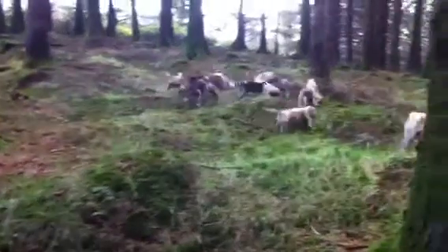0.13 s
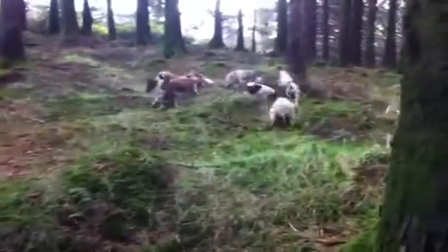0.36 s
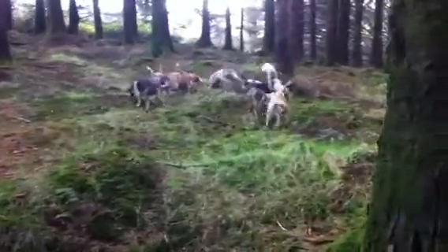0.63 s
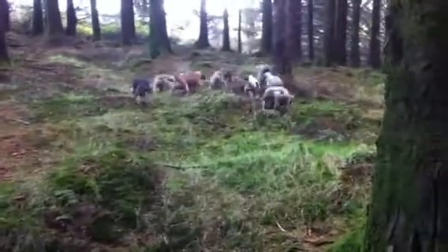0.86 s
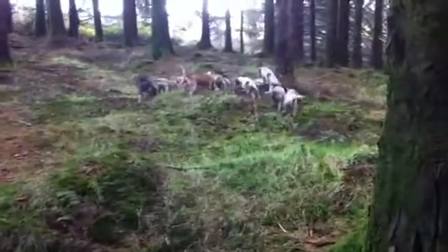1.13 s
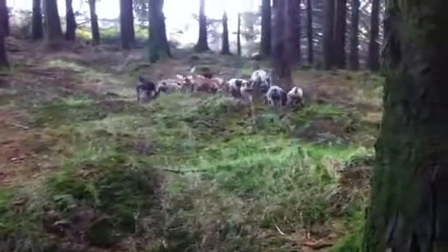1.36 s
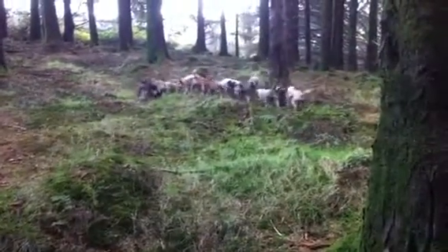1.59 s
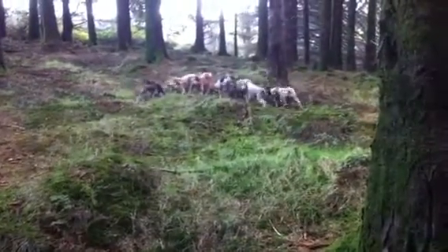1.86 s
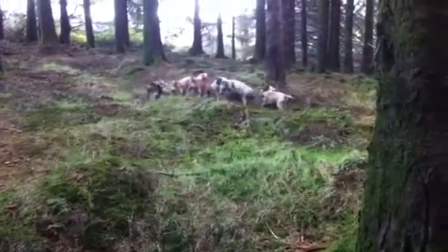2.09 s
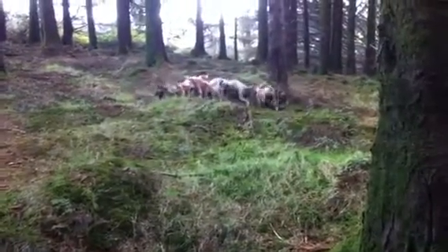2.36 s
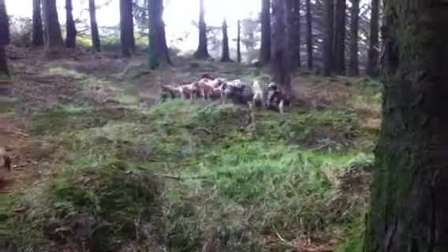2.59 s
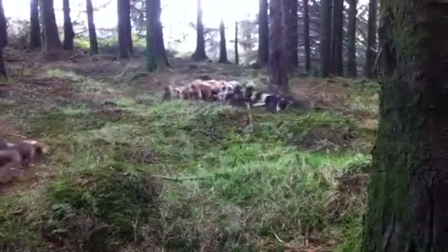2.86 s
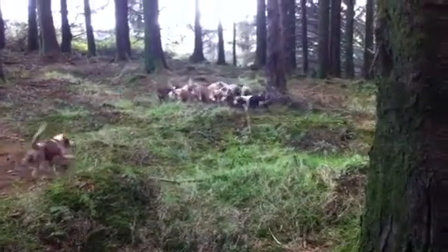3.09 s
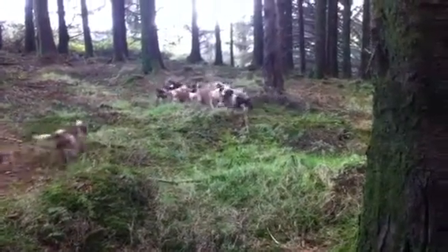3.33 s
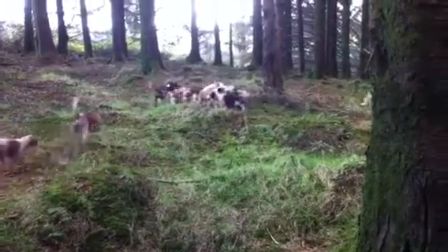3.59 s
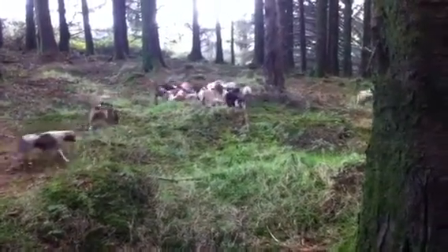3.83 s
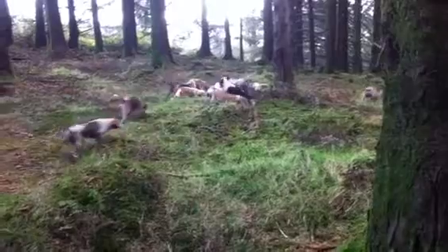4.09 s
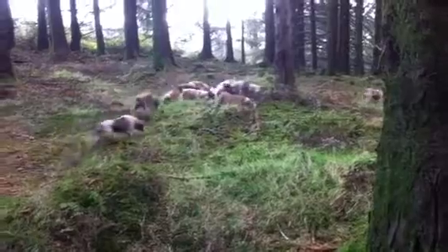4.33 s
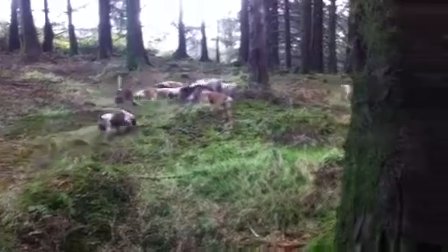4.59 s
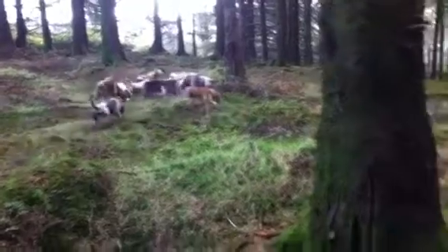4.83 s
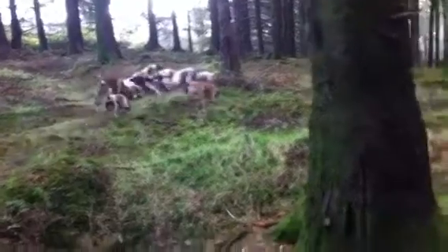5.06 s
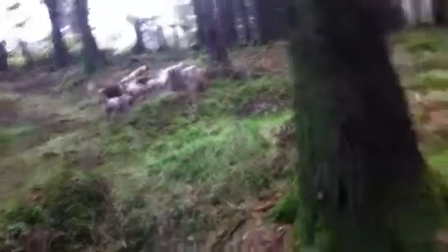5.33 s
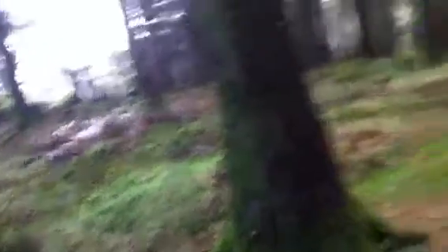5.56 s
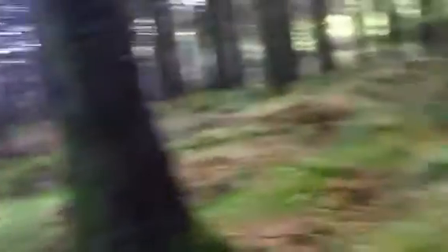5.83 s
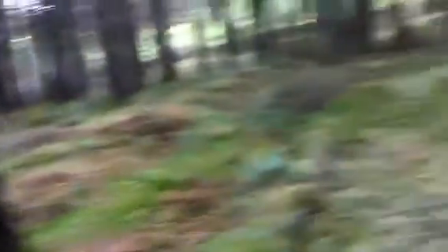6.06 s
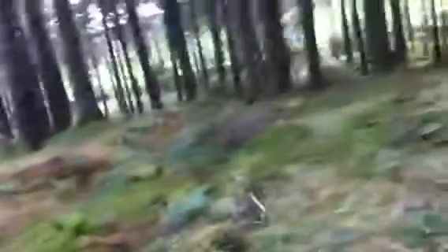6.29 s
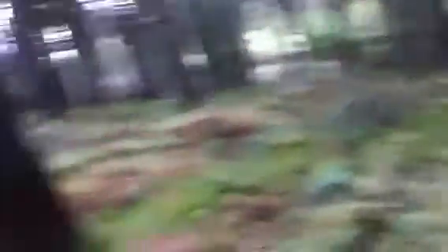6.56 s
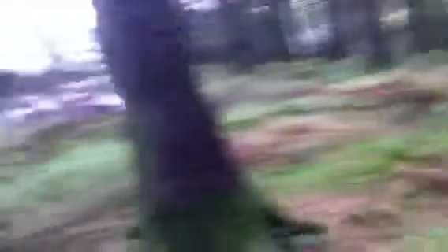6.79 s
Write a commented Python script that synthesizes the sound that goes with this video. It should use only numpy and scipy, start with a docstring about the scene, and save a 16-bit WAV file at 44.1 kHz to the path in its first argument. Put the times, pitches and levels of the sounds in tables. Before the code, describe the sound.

A quiet conifer wood, with soft air and a very faint dry rustle of paws in needles. Sharp twig ticks come at about 0.15, 0.4 and 1.4-1.75 s, with tiny distant yaps before 1 s. At 1.7 s a hound some way off bays for about 0.8 s: a hoarse, mid-pitched cry that leaps to a yelp, dips and wavers, with a rough second pitch beating against it. A louder bay scoops up at 2.9 s and fades by 3.5 s. Near quiet follows, leaving a faint echo tail. The third bay runs from 4.7 to 5.6 s, when dull microphone bumps begin. The fourth, from 6.05 to 6.75 s, is bright and yelping, with faint fluttering high tones. Close rustling grows from 6.1 s; snaps, footfalls and low handling thumps crowd the end, the strongest knock at 6.9 s.

```python
"""Twigs tick and paws rustle through needles and grass in a hushed conifer wood, with faint yaps far off.
From 1.7 s a hound bays four times some way off: two vibrations of its vocal folds beat against each
other through a resonant throat, and the trunks scatter the cries into a long faint tail of decaying noise.
Near the end come close footfalls and knocks on the hand-held microphone as its carrier turns and steps,
made of soft pushes with a rumble; faint high tones, gliding and fluttering, sound during the last bay."""
import sys
import numpy as np
from scipy import signal
from scipy.fft import rfft, irfft
from scipy.io import wavfile
from scipy.ndimage import uniform_filter1d

SR = 44100
rng = np.random.default_rng(int(sys.argv[2]) if len(sys.argv) > 2 else 0)


def voltage_ratio(level):
    """Linear amplitude factor for a level in decibels (scalar or array-like)."""
    return 10 ** (np.asarray(level, float) / 20)


def digitize_waveform(pressure):
    """Quantize a signal to 16-bit integers and store it at the path in sys.argv[1].

    Rows of a 2-D input are taken as channels; values are limited to [-1, 1].
    """
    field = np.atleast_2d(pressure).T
    bounded = np.clip(field, -1, 1)
    quanta = np.round(bounded * 32767).astype(np.int16)
    wavfile.write(sys.argv[1], SR, quanta)


N = 305613

# bays, one curve each for the lower vibration; most start low, leap to a yelp, dip and settle:
# (time [s], pitch [Hz], level [dB])
BAYS = [
    [(1.66, 568, -42.5), (1.695, 579, -36.5), (1.71, 668, -30), (1.80, 670.3, -25.5), (1.90, 557.6, -31.5),
     (2.0, 557, -37.5), (2.06, 594.3, -32.5), (2.26, 571.8, -34), (2.42, 591.4, -34.5)],
    [(2.911, 573.7, -23.5), (2.955, 589.5, -16.5), (3.02, 604.7, -22.5), (3.09, 573, -30.5),
     (3.28, 610.4, -29.5), (3.42, 608.4, -38.5)],
    [(4.738, 582.4, -39), (4.785, 591.8, -20.5), (4.80, 657.5, -26), (4.87, 679, -22.5), (4.96, 594.7, -31),
     (5.05, 630.3, -29), (5.26, 596.7, -36), (5.55, 558.4, -41.5)],
    [(6.049, 560.5, -37), (6.09, 566, -29.5), (6.11, 678.7, -19.5), (6.23, 674.6, -26), (6.26, 588.4, -32),
     (6.37, 610, -33), (6.68, 565.4, -37)],
]
# colour of each bay: (upper layers at the start [dB], clean overtones [dB], bright opening [dB],
# nasal ring [Hz], ring at the start [dB], ring at the end [dB], chest at the end [dB])
COLOUR = [(-37, -8, -6, 2250, -17, -31, -25.5), (-38, -12.5, -7.5, 2280, -30, -23, -27),
          (-38, -6, -1, 2220, -21.5, -12.5, -23.5), (-31, -11, -1.5, 2448, -19.5, -21.5, -24)]
# undergrowth and air: (time [s], rustle of paws and feet [dB], bass of air and handling [dB])
UNDERGROWTH = [(0.0, -63.5, -67.5), (1.618, -64.5, -70), (1.87, -62.5, -66.5), (3.09, -61.5, -68.5),
               (3.709, -66, -72), (4.38, -72.5, -70.5), (4.77, -63.5, -65), (5.5, -65, -69),
               (5.74, -66, -65), (5.82, -57.5, -53.5), (6.04, -62.5, -70), (6.09, -50, -70),
               (6.27, -54.5, -67.5), (6.66, -52.5, -56.5), (6.8, -55.5, -42), (6.93, -54, -51)]
ATTACK_S, RELEASE_S = 0.026, 0.085  # of each bay


def band(x, hz, width):
    """Two-pole resonance, gain 1 at the centre."""
    return signal.lfilter(*signal.iirpeak(min(hz, 18000), hz / width, fs=SR), x)


def unit(x):
    """Scale to rms 1."""
    return x / np.sqrt(np.mean(x ** 2))


def walk(rate):
    """Random levels held 1 / rate s and slewed twice; spread 1."""
    hold = int(SR / rate)
    steps = np.repeat(rng.standard_normal(N // hold + 1), hold)
    slewed = uniform_filter1d(uniform_filter1d(steps, hold), hold)
    return unit(slewed[:N])


def coloured(x, table):
    """Give x the spectrum (frequency [Hz], level [dB]), rms 1."""
    hz, db = np.transpose(table)
    f = np.arange(N // 2 + 1) * SR / N + 1  # 1 Hz up, so the logarithm exists at zero
    gain = voltage_ratio(np.interp(np.log(f), np.log(hz), db))
    return unit(irfft(rfft(x) * gain, N))


def hound():
    """Two vibrations of the folds; where they couple, sum and difference lines fill the throat, with rasp."""
    gate, hz, tone_db, upper_db, clean_db, ring_db, chest_db = bays()
    low, size = folds(hz * (1 + 0.006 * walk(12)), jitter=0.006, shimmer_db=1.5)
    high_hz, level_high = registers()
    high, size_high = folds(high_hz, jitter=0.006, shimmer_db=1.5)

    harmonics = sum(np.sin(k * low) * (1 + 0.35 * (k - 1) * walk(100)) / (k - 1) ** 0.7
                    for k in range(2, 5))
    overtones = voltage_ratio(clean_db) * size * harmonics
    # the beat between both, with its half and other multiples, modulates the lower cry
    beat = high - low
    beating = (0.8 * np.cos(2 * beat) + 0.6 * np.cos(beat / 2)
               + 0.3 * np.cos(beat) + 0.4 * np.cos(3 * beat / 2))
    coupled = size_high * np.sin(low) * beating
    # breath noise that swells with each cycle of the lower vibration
    rasp = (1 + 0.41 * np.cos(low)) * rng.standard_normal(N) * voltage_ratio(2.5 * walk(40))
    upper = voltage_ratio(3.0) * throat(overtones) + unit(throat(coupled)) + voltage_ratio(1.5) * unit(throat(rasp))

    t = np.arange(N) / SR
    ring_source = overtones + 1.6 * rasp
    ring_width_hz = 310
    for bay, (_, _, _, ring_hz, *_) in zip(BAYS, COLOUR):
        nasal = unit(band(band(ring_source, ring_hz, ring_width_hz), ring_hz, ring_width_hz))
        during_bay = (t > bay[0][0]) * (t < bay[-1][0] + RELEASE_S)
        upper = upper + during_bay * voltage_ratio(ring_db) * nasal

    # each bay opens with the mouth wide: a bright burst of overtones and rasp that closes quickly
    wide = [(bay[0][0] + ATTACK_S, colour[2]) for bay, colour in zip(BAYS, COLOUR)]
    wide += [(6.28, -2.5)]  # the mouth opens wide once more within the last bay (s, dB)
    opening = sum(voltage_ratio(db) * np.exp(np.minimum((t - s) / 0.015, (s - t) / 0.061)) for s, db in wide)
    bright = band(voltage_ratio(6.0) * overtones + 2.3 * rasp, 1500.0, 1600.0)
    bright = band(band(bright, 2000.0, 2000.0), 2000.0, 2000.0)
    upper = upper + opening * unit(bright)

    # the difference tones below the cry give it a rough chest
    chest = voltage_ratio(chest_db) * size_high * (np.sin(low - beat) + 2.1 * np.sin(low - beat / 2))
    lower_cry = gate * (voltage_ratio(tone_db) * (size * np.sin(low) + chest) + voltage_ratio(upper_db) * upper)
    return lower_cry + level_high * size_high * np.sin(high)


def bays():
    """Gate, pitch, levels and colour of the lower vibration, all bays on one time axis."""
    silent_db, chest_start_db, darken_db_per_s = -33.5, -43.5, 14
    t = np.arange(N) / SR
    gate, hz, tone_db, upper_db, clean_db, ring_db, chest_db = np.zeros((7, N))
    for bay, (open_db, clean, _, _, ring, ring_end, chest) in zip(BAYS, COLOUR):
        s, pitch, db = np.transpose(bay)
        u, length = t - s[0], s[-1] - s[0]
        on = (u > 0) & (u < length + RELEASE_S)
        attack = (1 - u / ATTACK_S).clip(0, 1) ** 2
        release = ((u - length) / RELEASE_S).clip(0, 1)
        edge_db = silent_db * (attack + release)
        gate += on
        hz += on * np.interp(t, s, pitch)
        tone_db += on * (np.interp(t, s, db) + edge_db)
        upper_db += on * (open_db - darken_db_per_s * u + edge_db)
        clean_db += on * clean
        ring_db += on * (ring + (ring_end - ring) * u / length)
        chest_db += on * (chest_start_db + (chest - chest_start_db) * u / length)
    return gate, hz, tone_db, upper_db, clean_db, ring_db, chest_db


def registers():
    """Pitch and size of the upper vibration, which holds a register briefly, gliding, then jumps to another."""
    # clear registers: (start [s], length [s], start pitch [Hz], end pitch [Hz], level [dB])
    clear_registers = [(1.817, 0.051, 910, 873, -28.5), (1.889, .13, 836, 829, -25.5),
                       (2.02, 0.044, 834.5, 830.5, -32), (2.088, 0.07, 850, 874, -33.5),
                       (2.16, .1, 785.3, 755, -31), (2.265, 0.097, 789, 796, -32),
                       (2.367, 0.081, 725.3, 699.6, -35), (2.441, 0.05, 814, 797, -32.5),
                       (2.972, .11, 886, 871.4, -39), (3.201, 0.089, 833.4, 819, -35),
                       (3.33, 0.13, 860, 799.8, -38), (4.823, 0.19, 921.3, 879.5, -40),
                       (5.163, 0.097, 789, 767, -37), (5.486, 0.072, 830, 795.3, -29.5),
                       (6.059, 0.089, 1040, 929.8, -28), (6.202, 0.095, 938.7, 843, -37.5),
                       (6.305, 0.05, 1151, 1107, -28), (6.605, 0.11, 837, 793, -39)]
    # fainter registers that come by chance in between
    weak_hz, weak_spread_hz, sag_hz_per_s = 830, 55, 230
    weak_db, weak_s = -41.5, 0.07
    t = np.arange(N) / SR
    step = (t / weak_s).astype(int)
    chance = rng.standard_normal((N // 1000, 2))[step].T  # one draw of pitch and level per register
    hz = weak_hz + weak_spread_hz * chance[0] - sag_hz_per_s * (t % weak_s)
    voiced = sum((t > bay[0][0] + ATTACK_S) & (t < bay[-1][0]) for bay in BAYS)
    swell = np.sqrt(2 * np.sin(np.pi * (t / weak_s % 1)).clip(0))
    size = voiced * voltage_ratio(weak_db + 3.0 * chance[1]) * swell
    for s, length, start_hz, end_hz, db in clear_registers:
        u = (t - s) / length
        on = (u > 0) & (u < 1)
        fade = (np.minimum(u, 1 - u) * length / 0.012).clip(0, 1)
        hz = np.where(on, start_hz + (end_hz - start_hz) * u, hz)
        size = np.where(on, voltage_ratio(db) * np.sqrt(2) * fade, size)
    return uniform_filter1d(hz, size=200), uniform_filter1d(size, size=200)


def folds(hz, jitter, shimmer_db):
    """Phase and size of vocal folds whose pitch and strength wander quickly at random."""
    wandering_hz = hz * (1 + jitter * walk(150) + jitter * walk(25))
    phase = 2 * np.pi * np.cumsum(wandering_hz) / SR
    return phase, np.sqrt(2) * voltage_ratio(shimmer_db * (walk(80) + walk(25) / 2))


def throat(x):
    """Resonances of throat and open mouth, each passed twice so the valleys stay dark."""
    # (centre [Hz], width of one pass [Hz], level [dB])
    resonances = [(378, 370, -35), (637, 104, 11.5), (850, 260, 7), (1042, 547, 1.5), (1670, 1500, -27.5),
                  (4470, 3500, -40.5)]
    out = 0
    for k, (hz, width, db) in enumerate(resonances):
        out = out + (-1) ** k * voltage_ratio(db) * band(band(x, hz, width), hz, width)  # neighbours alternate in sign
    return out


def short_glides():
    """Short hoarse glides: faint distant yaps, the rising scoop into the second bay, a falling partial in the fourth."""
    # (start [s], level [dB], start pitch [Hz], end pitch [Hz], length [s])
    glide_list = [(0.259, -56, 1044, 943, 0.041), (0.495, -61, 1420, 1330, 0.066),
                  (.9, -60.5, 1543, 1490, 0.063), (2.868, -41.5, 517.6, 825, 0.072),
                  (2.885, -49, 900, 1283, 0.06), (4.108, -52.5, 889.7, 885, 0.018),
                  (6.27, -42, 1861, 1516, 0.086)]
    return glides(glide_list, hoarse=0.55)


def glides(table, hoarse):
    """Short tones that glide in pitch, roughened by a fast flutter."""
    out = np.zeros(N)
    for s, db, hz, end_hz, length in table:
        t = np.arange(int(length * SR)) / SR
        flutter = 1 + hoarse * unit(uniform_filter1d(rng.standard_normal(20000), 60))[:len(t)]
        tone = np.sin(2 * np.pi * (hz * t + (end_hz - hz) * t ** 2 / length / 2))
        swell = np.sqrt(np.sin(np.pi * t / length))
        out[int(s * SR):int(s * SR) + len(t)] += voltage_ratio(db) * swell * flutter * tone
    return out


def wood(x):
    """Near trunks give a short dense scatter, far ones a long dull tail."""
    near_t60_s, near_db, far_t60_s, far_db = 0.2, -12, 1.5, -16
    t = np.arange(int(1.6 * SR)) / SR
    tails = [rng.standard_normal(len(t)) * voltage_ratio(-60 * t / t60) for t60 in (near_t60_s, far_t60_s)]
    near, far = (tail / np.sqrt(np.sum(tail ** 2)) for tail in tails)
    early = signal.fftconvolve(x, near)[:N]
    # stirring branches smear the pitch of what returns from far off, by a fast random change of level
    stirred = x * (0.9 + walk(50) + walk(200)) / 1.7
    late = signal.fftconvolve(stirred, band(far, 800.0, 1500.0))[:N]
    return voltage_ratio(-2.5) * x + voltage_ratio(near_db) * early + voltage_ratio(far_db) * late


def rustle():
    """Paws and feet in the litter: dry hiss in swells plus sparse crackle with a few large grains."""
    # spectrum of needles and grass: (frequency [Hz], level per Hz [dB])
    litter_spectrum = [(880, -13.5), (1500, -7), (2570, -10.5), (5000, -9), (6500, -11), (8880, -8.5),
                       (15500, -19.5)]
    swell_db = 1.5 * walk(4.5) + 1.3 * walk(14) + 1.8 * walk(60)
    hiss = rng.standard_normal(N) * voltage_ratio(swell_db)
    struck = rng.random(N) < 500 / SR  # about 500 grains a second
    grain_db = 5.8 * np.minimum(rng.exponential(size=N), 3.8)
    grains = struck * rng.standard_normal(N) * voltage_ratio(grain_db)
    scrapes = uniform_filter1d(abs(grains), size=50) * rng.standard_normal(N)  # each grain is a short scrape
    mix = unit(hiss) + 0.53 * unit(scrapes)
    s, db, _ = np.transpose(UNDERGROWTH)
    return coloured(mix, litter_spectrum) * voltage_ratio(np.interp(np.arange(N) / SR, s, db))


def twigs():
    """A sharp broad crack ringing briefly round its own pitch, with a fainter tail."""
    # (start [s], peak level [dB], centre [Hz])
    snap_list = [(0.1534, -38.5, 8590), (0.1773, -26, 4930), (0.382, -35, 10200), (.725, -44, 11000),
                 (1.04, -54, 4670), (1.3962, -48, 2610), (1.4714, -38.5, 2600), (1.5475, -33, 9200),
                 (1.751, -35, 3980), (3.02, -39, 9000), (3.5071, -39, 8320), (5.9094, -45.5, 4920),
                 (6.4042, -32, 3640), (6.6354, -38, 9143), (6.6895, -32.5, 9000), (6.7405, -29, 9330),
                 (6.901, -36.5, 2730)]
    out, t = np.zeros(N + 4000), np.arange(4000) / SR
    for (s, db, hz), noise in zip(snap_list, rng.standard_normal((len(snap_list), 4000))):
        crack = noise * voltage_ratio(-60 * t / 0.01) * np.clip(t / 0.00062, 0, 1)
        tail = band(noise * voltage_ratio(-60 * t / 0.19), hz, 1.2 * hz)
        snap = 0.39 * crack + band(crack, hz, 0.42 * hz) + 0.099 * tail
        out[int(s * SR):int(s * SR) + 4000] += voltage_ratio(db) * snap / abs(snap).max()
    return out[:N]


def knocks():
    """Microphone knocks and close footfalls: a soft dull push of about 1.5 cycles, then a casing rumble."""
    # (start [s], level of the push [dB], centre [Hz])
    knock_list = [(1.838, -55, 48.7), (5.55, -38, 178), (5.574, -32, 268), (5.984, -36, 266),
                  (6.009, -37.5, 222.2), (6.512, -32.5, 230.5), (6.651, -39, 211.1), (6.696, -36, 200),
                  (6.769, -30.5, 240), (6.851, -28.5, 221), (6.9, -17, 427)]
    out, t = np.zeros(N + 6000), np.arange(6000) / SR
    for (s, db, hz), noise in zip(knock_list, rng.standard_normal((len(knock_list), 6000))):
        cycles = hz * t - 1.7  # from the crest of the push
        push = np.cos(2 * np.pi * cycles) * np.exp(-(cycles / 0.47) ** 2)
        dull = unit(band(band(noise, 170.0, 200.0), 170.0, 200.0))
        rumble = voltage_ratio(-17) * dull * voltage_ratio(-60 * t / 0.2) * np.clip(hz * t / 2, 0, 1)
        out[int(s * SR):int(s * SR) + 6000] += voltage_ratio(db) * (push + rumble)
    return out[:N]


def faint_high_tones():
    """Faint high tones during the last bay: a 6.4 kHz chirp and a fluttering band near 5 kHz."""
    # (start [s], level [dB], start pitch [Hz], end pitch [Hz], length [s])
    tone_list = [(6.03, -53.5, 6470, 6240, 0.029), (6.07, -60, 4670, 5140, 0.45)]
    return glides(tone_list, hoarse=1.1)


def air():
    """Forest hush; the bass flutters as the air stirs round the microphone."""
    # spectrum of the hush: (frequency [Hz], level per Hz [dB])
    hush_spectrum = [(180, -24), (300, -3.5), (461, -9), (600, -4), (1370, -11), (1620, -14), (15500, -20)]
    hush = voltage_ratio(-66) * coloured(rng.standard_normal(N), hush_spectrum)
    low_noise = band(band(rng.standard_normal(N), 168.0, 200.0), 168.0, 200.0)
    bass = unit(low_noise * voltage_ratio(4.7 * walk(4.014) + 2.0 * walk(10.0)))
    s, _, db = np.transpose(UNDERGROWTH)
    return hush + bass * voltage_ratio(np.interp(np.arange(N) / SR, s, db))


def scene():
    """Cries through the wood, over the sounds that reach the microphone directly."""
    far = wood(hound() + short_glides())
    direct = rustle() + air() + twigs() + knocks() + faint_high_tones()
    return (far + direct)[None]


def band_limit(x):
    """A steep low-pass at the top of the band."""
    return signal.sosfilt(signal.butter(12, 16480, fs=SR, output="sos"), x)


def record(dry):
    """A small microphone loses the deepest bass; the top is cut steeply."""
    bass_cut = signal.butter(1, 60, "high", fs=SR, output="sos")
    top_cut = signal.ellip(8, 0.2, 70, 15850, fs=SR, output="sos")
    mix = signal.sosfilt(top_cut, signal.sosfilt(bass_cut, dry))
    return band_limit(mix)


dry = scene()
out = record(dry)
digitize_waveform(out)
```